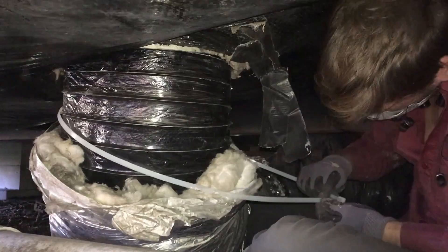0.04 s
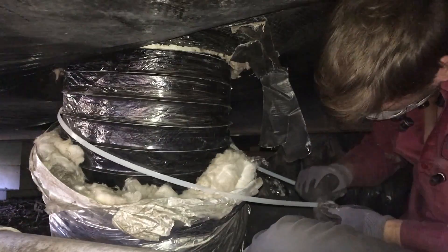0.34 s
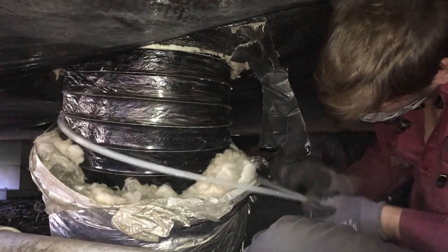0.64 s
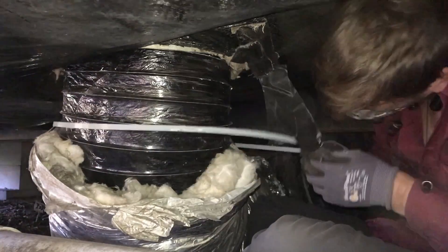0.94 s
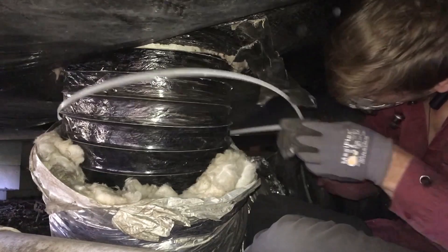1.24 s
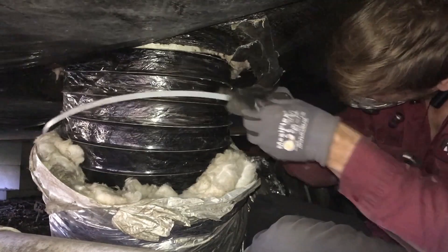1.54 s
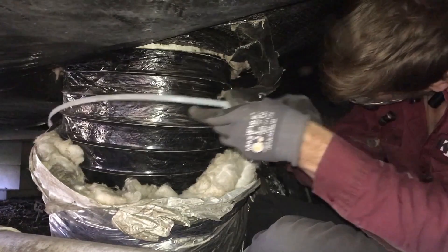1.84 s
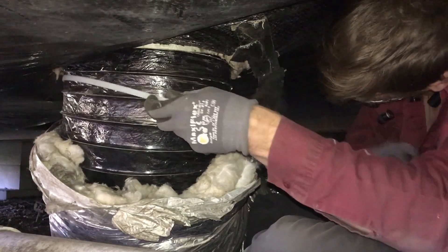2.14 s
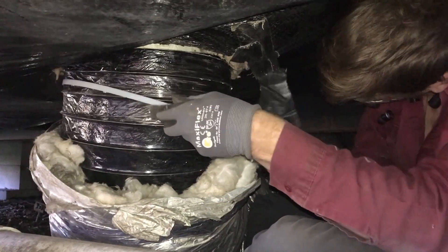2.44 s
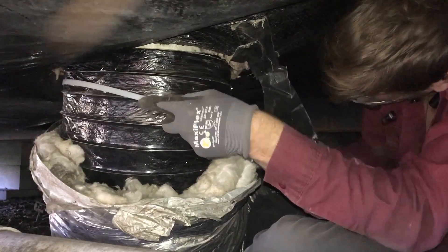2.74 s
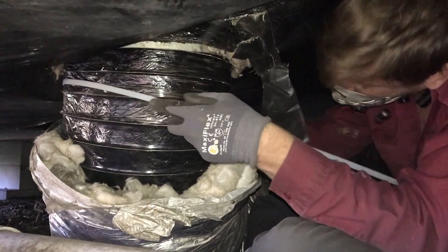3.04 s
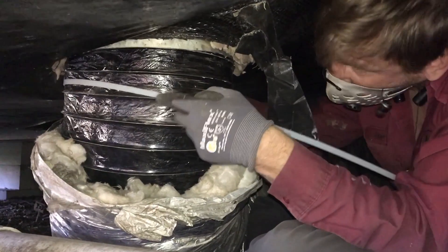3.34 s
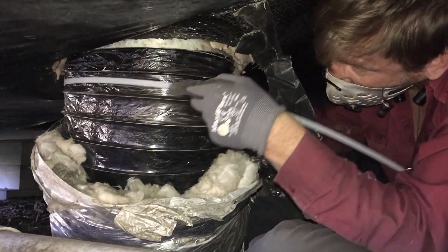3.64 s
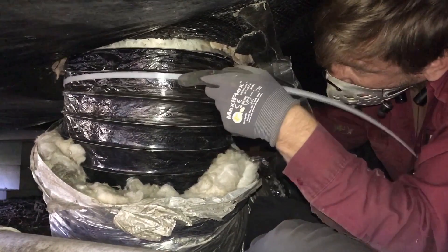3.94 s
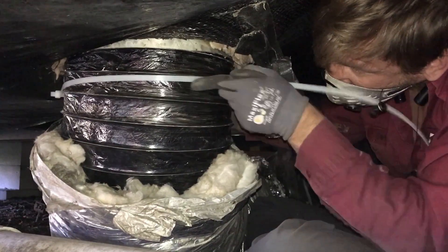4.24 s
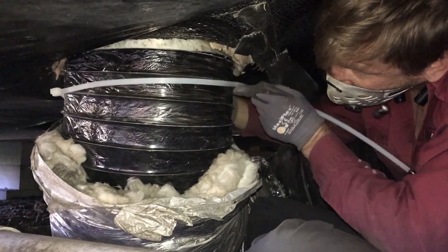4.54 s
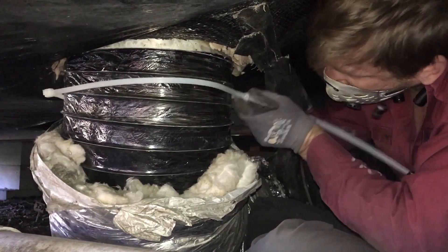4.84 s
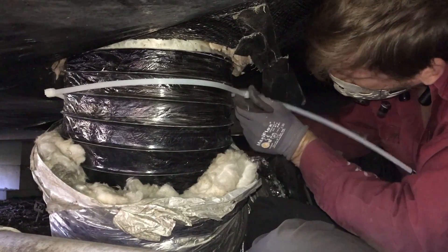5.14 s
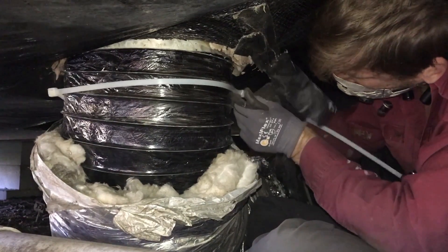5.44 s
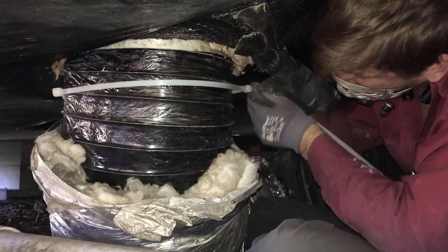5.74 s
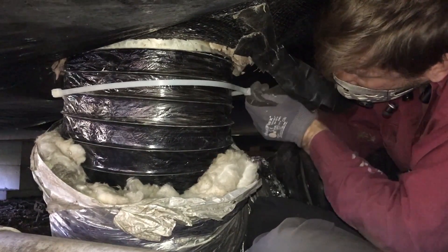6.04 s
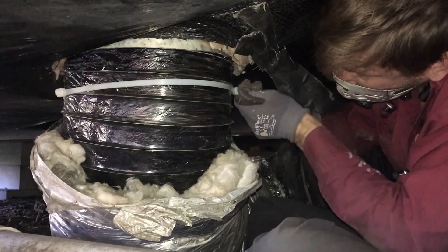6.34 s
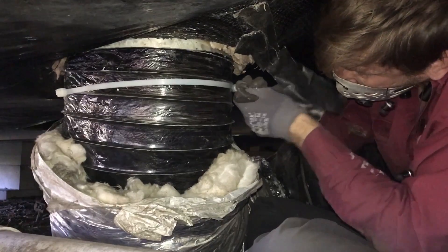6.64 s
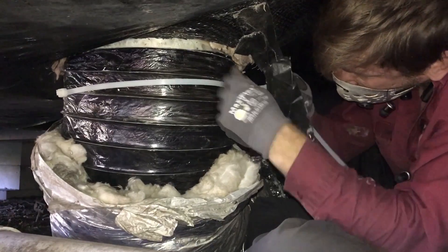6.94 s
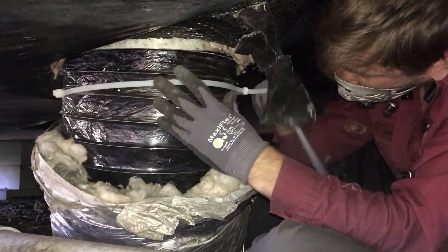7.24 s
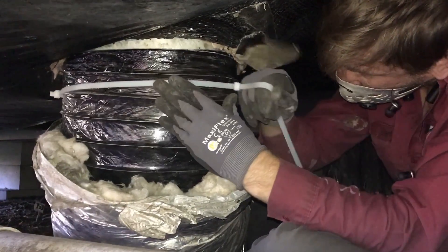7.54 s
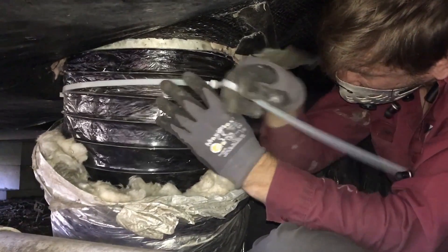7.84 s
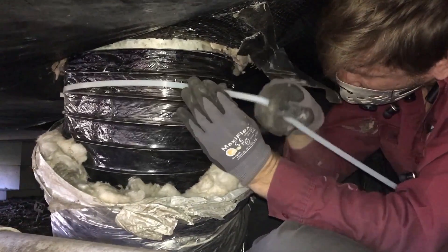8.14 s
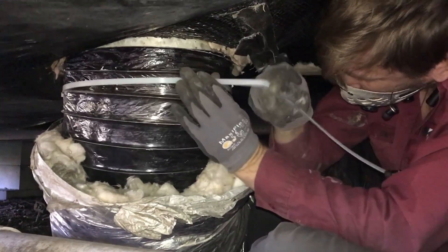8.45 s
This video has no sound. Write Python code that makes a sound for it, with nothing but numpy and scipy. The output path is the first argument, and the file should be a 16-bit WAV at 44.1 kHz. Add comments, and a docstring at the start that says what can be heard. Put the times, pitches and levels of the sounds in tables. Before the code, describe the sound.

Gloved hands pull a plastic cable tie through with a short, loud zip, then rub and crinkle a flexible duct and tighten a few clicks more.

```python
"""Sleeves rustle and light knocks sound over a low rumble in a cramped crawl space, where gloved hands
tighten a long nylon cable tie round a flexible foil duct. The strap slides, then zips through its pawl:
each tooth is an impulse, the pawl's resonance squeals, and the tooth rate is a tone that groans down
to a stop. A short pull and a few single teeth later draw it tight. Between the pulls, gloves rasp by
friction and the duct's thin skin buckles, crinkling and crunching."""
import sys
import numpy as np
from scipy import signal
from scipy.io import wavfile
from scipy.ndimage import uniform_filter1d

SR = 44100
rng = np.random.default_rng(int(sys.argv[2]) if len(sys.argv) > 2 else 0)


def generate_wav(signal):
    """Clip the signal to [-1, 1] and save it as 16-bit WAV at the path in sys.argv[1]."""
    frames = np.transpose(np.atleast_2d(signal))
    scaled = np.clip(frames, -1, 1) * 32767
    pcm = np.round(scaled).astype(np.int16)
    wavfile.write(sys.argv[1], SR, pcm)


N = 374409
TIME = np.arange(N) / SR
SLACK_FROM_S, SNUG_FROM_S, TIGHT_FROM_S = 1.75, 4, 6.25  # stages of the loop, which starts open

# Speed of the strap in the long pull and the tone it sings: time_s, teeth_per_s, groan_db
PULL_MOTION = [(1.7966, 430, -73), (1.869, 356, -50.5), (1.885, 520, -55), (1.922, 343, -62),
               (1.934, 600, -46.5), (1.95, 577, -45.5), (1.962, 710, -48.5), (1.977, 910, -38),
               (2.019, 858, -43.5), (2.08, 920, -57), (2.115, 747, -58), (2.155, 790, -42),
               (2.18, 830, -63), (2.2, 890, -54), (2.223, 767, -42.5), (2.24, 640, -56), (2.26, 640, -50.5),
               (2.28, 490, -51), (2.3, 342, -51), (2.332, 170, -63)]
# Spectrum of a snap in the foil skin: frequency_hz, gain_db
FOIL_SPECTRUM = [(300, -0.5), (900, 14), (4500, 13), (16000, 3.5)]


def amp(db):
    return 10 ** (np.asarray(db) / 20)


def unit_rms(x):
    return x / np.sqrt(np.mean(x ** 2) + 1e-20)


def running_rms(x, size):
    return np.sqrt(abs(uniform_filter1d(x ** 2, size)) + 1e-10)


def add(mix, start_s, sound):
    part = mix[max(round(start_s * SR), 0):][:len(sound)]
    part += sound[:len(part)]


def colour(x, spectrum, size=2048):
    """A minimum-phase filter of unit energy imposes a spectral shape."""
    hz, db = np.transpose(spectrum)
    bins = abs(np.fft.fftfreq(size, 1 / SR))
    log_gain = np.log(amp(np.interp(np.log(bins + 1), np.log(hz + 1), db)) + 1e-5)
    taps = np.fft.ifft(np.exp(np.conj(signal.hilbert(log_gain)))).real[:size // 2]
    return signal.oaconvolve(x, taps / np.linalg.norm(taps))[:len(x)]


def resonate(x, hz, width_hz):
    """A resonance of unit gain follows the frequency curve hz."""
    carrier = np.exp(2j * np.pi * np.cumsum(hz) / SR)
    pole = np.exp(-np.pi * width_hz / SR)
    return 2 * (carrier * signal.lfilter([1 - pole], [1, -pole], x / carrier + 1e-18)).real


def wander(per_s):
    """Random modulation glides between Gaussian values."""
    knots = rng.standard_normal(N // 16)
    return np.interp(TIME * per_s, np.arange(len(knots)), knots)


def snap(loose, t60, scatter=None, size=700):
    """An impulse and its decaying scatter, weighted by loose, share unit energy."""
    scatter = rng.standard_normal(size) if scatter is None else scatter
    scatter = scatter * amp(-60 * np.arange(size) / SR / t60)
    burst = loose * scatter / np.linalg.norm(scatter)
    burst[0] = 1
    return burst / np.linalg.norm(burst)


def impulse_size(db, window_s=0.015):
    """An impulse of this height has mean level db over the window."""
    return amp(db) * np.sqrt(window_s * SR)


def friction(grains_per_s, spread_db, grainy, flutter_db):
    """Stick-slip friction: countless tiny slips merge into noise, with sparse larger ones."""
    sizes = amp(spread_db * np.minimum(rng.exponential(1, N), 4)) * rng.choice([-1, 1], N)
    grains = unit_rms(sizes * (rng.random(N) < grains_per_s / SR))
    slips = rng.standard_normal(N) + grainy * grains
    return unit_rms(slips * amp(flutter_db * wander(per_s=55)))


def air(rumble_db=-66.5, hum_hz=59.8, hum_db=-81):
    """Low-frequency noise rumbles under a faint hum that wavers by phase modulation."""
    # Still air under the floor: frequency_hz, gain_db
    air_spectrum = [(20, -16.5), (45, -3), (81, -1), (130, -13.5), (320, -10), (450, -21.5), (1400, -27.5),
                    (1900, -23.5), (2400, -32), (9000, -35), (16000, -52)]
    hum = np.sqrt(2) * np.sin(2 * np.pi * hum_hz * TIME + wander(per_s=10))
    rumble = unit_rms(colour(rng.standard_normal(N), air_spectrum, size=16384))
    return amp(rumble_db) * rumble + amp(hum_db) * hum


def sleeves():
    """Friction in cloth keeps up a soft, fine-grained rustle, still only for a moment."""
    # Envelope of the rustle: time_s, level_db
    envelope = [(0, -64.5), (.3, -78.5), (.36, -113), (.45, -70.5), (2.4, -71.5), (5.6, -71), (8.49, -63.5)]
    # Spectrum of rubbing cloth: frequency_hz, gain_db
    cloth_spectrum = [(400, -11.5), (900, 3.5), (1300, -4.5), (2500, -0.5), (16000, -6)]
    rustle = friction(grains_per_s=300, spread_db=2.5, grainy=0.6, flutter_db=3.5)
    return colour(rustle * amp(np.interp(TIME, *np.transpose(envelope))), cloth_spectrum)


def knocks(rise_s=0.002):
    """Each impact gives a tick and excites quickly damped modes of strap and duct."""
    # Light impacts of strap and hands: start_s, body_db, tick_db, pitch_hz
    impacts = [(.027, -58.5, -71, 945), (0.192, -55.5, -63, 760), (0.2482, -54, -66, 960),
               (0.3701, -47, -57, 898), (.417, -58.5, -65.5, 840), (.477, -61, -83, 775),
               (.511, -56.5, -63.5, 826), (0.7517, -47, -52.5, 834), (1.211, -58, -55.5, 930),
               (2.2275, -43.5, -45, 858.4), (3.366, -61, -74, 990), (3.498, -57, -69, 990),
               (3.666, -60, -74, 950), (3.681, -54.5, -68, 1000), (3.79, -53.5, -51.5, 800),
               (4.565, -57, -50, 890), (4.706, -64.5, -61.5, 900), (5.486, -64, -55, 1080),
               (6.749, -52.5, -52.5, 800), (6.803, -61, -56, 570), (7.088, -58.5, -60.5, 340),
               (7.213, -56.5, -56.5, 710)]
    # Modes of strap and duct: frequency_ratio, gain_db, t60_s
    modes = [(0.998, 5.5, 0.013), (0.77, -17, 0.056), (1.21, -20.5, 0.035), (0.387, -18, 0.047),
             (1.77, -8, 0.011)]
    t = TIME[:SR // 10]
    bodies, ticks = np.zeros((2, N))
    for start_s, body_db, tick_db, hz in impacts:
        ring = sum(amp(db - 60 * t / t60) * np.sin(2 * np.pi * hz * k * t) for k, db, t60 in modes)
        ring *= 1 - np.exp(-t / rise_s)
        add(bodies, start_s, impulse_size(body_db) * ring / np.linalg.norm(ring))
        add(ticks, start_s, impulse_size(tick_db) * snap(loose=4.3, t60=0.024))
    return bodies + colour(ticks, FOIL_SPECTRUM)


def sliding(ends_db=-13, fold_hz=4900, fold_db=-2, gloves_from_s=2):
    """Sliding friction of the strap, later of gloves, hisses while the hollow duct resonates."""
    # Strokes over the duct: start_s, fastest_s, end_s, hiss_db, rub_db
    strokes = [(0.558, 0.774, 0.88, -67, -68), (0.912, 0.916, 0.97, -57, -60.5),
               (0.93, 1.195, 1.54, -62, -66.5), (2.199, 2.297, 2.44, -60.5, -65.5),
               (2.91, 3.41, 3.56, -66.5, -69.5), (3.787, 4.1, 4.24, -63, -74.5),
               (4.215, 4.575, 4.67, -56, -73), (4.73, 4.906, 5.2, -66, -81),
               (5.231, 5.26, 5.38, -61.5, -81), (6.82, 6.944, 7.1, -68.5, -69),
               (7.232, 7.38, 7.75, -57.5, -58.5), (7.503, 7.86, 7.96, -59, -62.5)]
    # Hiss of the loose strap: frequency_hz, gain_db
    strap_spectrum = [(900, -20), (1700, -23), (3300, -3), (11700, -0.5), (16000, -14)]
    # Rasp of the gloves: frequency_hz, gain_db
    glove_spectrum = [(900, -76), (1800, -6.5), (2400, -10.5), (3300, -1), (5500, -8), (13000, -6),
                      (16000, -17.5)]
    # Hollow response of the rubbed duct: frequency_hz, gain_db
    duct_spectrum = [(150, -12.5), (330, -0.5), (470, -7.5), (910, 1), (1240, -9.5), (1750, -5),
                     (3600, -17)]
    hiss_power, rub_power = np.zeros((2, N))
    for start, fastest, end, hiss_db, rub_db in strokes:
        before = (fastest - TIME) / max(fastest - start, 0.01)
        after = (TIME - fastest) / max(end - fastest, 0.01)
        speed_db = ends_db * np.minimum(np.maximum(before, after), 10) ** 2.23
        hiss_power += amp(hiss_db + speed_db) ** 2
        rub_power += amp(rub_db + speed_db) ** 2
    slips = friction(grains_per_s=800, spread_db=3.5, grainy=0.8, flutter_db=2) * np.sqrt(hiss_power)
    drags = friction(grains_per_s=220, spread_db=2, grainy=0.5, flutter_db=3) * np.sqrt(rub_power)
    # each fold touched lends the scrape a passing resonance
    passing_hz = fold_hz * 2 ** (0.5 * np.clip(wander(per_s=20), -2, 2))
    slips = (slips + amp(fold_db) * resonate(slips, passing_hz, width_hz=1500)) / np.sqrt(2)
    gloved = TIME > gloves_from_s
    hiss = colour(slips * ~gloved, strap_spectrum) + colour(slips * gloved, glove_spectrum)
    return hiss + colour(drags, duct_spectrum)


def tautness(time_s, taut_at_s=2.05, over_s=0.016):
    """Tension rises from 0 in the slack loop to 1 once it lies on the duct."""
    return np.clip((time_s - taut_at_s) / over_s, 0, 1)


def body_coupling(time_s, open_db=-25, snug_db=-8.5, tight_db=0.5):
    """Mechanical coupling: the tighter the strap, the more body vibration per click."""
    return amp(np.select([time_s < SNUG_FROM_S, time_s < TIGHT_FROM_S], [open_db, snug_db], tight_db))


def pawl_snaps(strikes, drift=0.21, stretch_per_s=0.58, stretch_from_s=1.6497, size=700):
    """Each tooth is an impulse: it clicks, pushes the strap's body and reflects along the free tail."""
    clicks, pushes = np.zeros((2, N))
    lag, echoes = np.arange(size), rng.standard_normal(size)
    for (time_s, click, push), (whip, grit, shake) in zip(strikes, rng.standard_normal((500, 3, size))):
        if time_s < SNUG_FROM_S:
            # the tail grows, so its echoes stretch and sink in pitch; it whips about, so they drift
            stretch = 1 + stretch_per_s * (time_s - stretch_from_s)
            echoes = unit_rms(echoes + drift * whip)
            scatter = np.interp(lag / stretch, lag, echoes) + 0.36 * grit
            # the first teeth snap cleanly; in the long pull the pawl chatters over each one
            loose, t60 = (1.0, 0.015) if time_s < SLACK_FROM_S else (2.7, 0.0098)
            add(clicks, time_s, click * snap(loose, t60, scatter))
            add(pushes, time_s, push * snap(loose=0.65, t60=0.031, scatter=0.5 * scatter + shake))
        else:
            # a tight strap snaps more sharply and shakes the duct
            add(clicks, time_s, click * snap(loose=2.5, t60=0.0088, scatter=0.5 * echoes + grit))
            add(pushes, time_s, push * snap(loose=0.65, t60=0.035, scatter=shake))
    return np.array([clicks, pushes])


def cable_tie():
    """Source and filter: tooth impulses excite pawl and strap, whose spectra change as the loop closes."""
    # Single teeth slipping past the pawl: start_s, level_db
    teeth = [(0.751, -46.5), (1.6353, -36.5), (1.6812, -40), (1.6894, -40), (1.6994, -38), (6.3016, -54),
             (6.3137, -50.5), (6.3340, -54.5), (6.4843, -49.5), (8.3713, -46.5), (8.393, -45),
             (8.3986, -46), (8.4307, -47), (8.4374, -49), (8.4570, -49.5), (8.478, -48)]
    # Short pulls: start_s, fastest_s, end_s, first_teeth_per_s, top_teeth_per_s, level_db, swell_db
    tugs = [(1.6497, 1.663, 1.679, 440, 600, -27.5, -2.5), (6.1515, 6.191, 6.2205, 170, 460, -38, 8.5)]
    # A tooth's click at five stages of closing the loop: frequency_hz, gain_db
    open_click = [(900, -52), (1900, -10.5), (3370, -8), (3910, -13), (5700, -0.5), (6900, -5),
                  (13000, 6.5), (16000, -2.5)]
    slack_click = [(900, -20.5), (1700, -3), (3400, -7), (4700, -8), (7700, 1), (11800, 4), (16000, -4)]
    taut_click = [(1500, -19), (3370, -8), (5120, -18), (6820, 0.5), (8850, -1), (10700, -10), (12000, 0.5),
                  (13600, -4), (15400, -1)]
    snug_click = [(1100, -40), (1900, -0.5), (4690, 1), (5780, -3.5), (7250, 5), (10000, 1), (11200, -3),
                  (13000, 1.5), (16000, -4)]
    tight_click = [(1100, -13), (2100, 1.5), (3500, -5), (4650, -4), (5830, -9.5), (10000, -8.5),
                   (11500, -23.5), (16000, -27)]
    # The strap's body, hanging free and pressed on the duct: frequency_hz, gain_db
    free_body = [(100, -42), (200, -2.5), (420, -7.5), (600, 0.5), (860, 6.5), (1250, -5), (1780, 2),
                 (2700, -34), (3600, -16)]
    pressed_body = [(130, -15), (330, 3.5), (680, 1.5), (850, 11.5), (1150, -3), (1650, 2), (3300, -19)]
    singles = [(s, impulse_size(db), impulse_size(db) * body_coupling(np.array(s))) for s, db in teeth]
    runs = [singles, long_pull()] + [tug(*row) for row in tugs]
    clicks, pushes = sum(pawl_snaps(run) for run in runs)
    taut = tautness(TIME)
    wide_open, pressed, tight = TIME < SLACK_FROM_S, TIME > SNUG_FROM_S, TIME > TIGHT_FROM_S
    running = clicks * ~wide_open * ~pressed
    early = colour(clicks * wide_open, open_click)
    zipping = colour(running * (1 - taut), slack_click) + colour(running * taut, taut_click)
    late = colour(clicks * pressed * ~tight, snug_click) + colour(clicks * tight, tight_click)
    body = colour(pushes * ~pressed, free_body) + colour(pushes * pressed, pressed_body)
    return early + zipping + late + body + pawl_ring(running) + groan()


def creases(fold_hz=920, fold_db=-55.5, db_per_octave=5):
    """Folds of the skin buckle with a dry snap; smaller, quieter folds have a higher low cutoff."""
    # The loudest buckling folds: start_s, level_db
    buckles = [(1.079, -62.5), (1.149, -61), (1.489, -63), (2.342, -56.5), (2.521, -68), (3.189, -65),
               (3.476, -59.5), (3.505, -61), (3.764, -51.5), (4.279, -59.5), (4.437, -63.5), (4.903, -53),
               (6.613, -56.5), (6.721, -54.5), (6.738, -56), (6.787, -64), (7.002, -62.5), (7.289, -52.5),
               (7.389, -55.5), (7.418, -55)]
    snaps = np.zeros(N)
    for start_s, db in buckles:
        cutoff_hz = min(fold_hz * 2 ** ((fold_db - db) / db_per_octave), SR / 10)
        fold = signal.lfilter(*signal.butter(2, cutoff_hz, "high", fs=SR), snap(loose=4, t60=0.017))
        add(snaps, start_s, impulse_size(db) * fold / np.linalg.norm(fold))
    return colour(snaps, FOIL_SPECTRUM)


def crunches():
    """Fingers press the skin into its padding and a cluster of small folds buckles at once."""
    # Finger presses: peak_s, time_constant_s, level_db, cutoff_hz
    presses = [(1.122, 0.01, -55, 4000), (3.714, 0.032, -60, 3500), (3.782, 0.019, -48, 15000),
               (4.579, .02, -48.5, 11300), (5.42, 0.014, -61.5, 9100), (6.72, 0.022, -59, 5970),
               (8.273, 0.015, -54.5, 13000)]
    grit = friction(grains_per_s=700, spread_db=2.5, grainy=1.2, flutter_db=2)
    clusters = np.zeros(N)
    for peak_s, time_constant_s, db, cutoff_hz in presses:
        muffled = unit_rms(signal.lfilter(*signal.butter(2, cutoff_hz, fs=SR), grit))
        clusters += muffled * amp(db) * np.exp(-abs(TIME - peak_s) / time_constant_s)
    return colour(clusters, FOIL_SPECTRUM)


def tooth_times(motion, jitter_s=0.000017):
    """Travel is the integral of speed; it gives the time and rate at which each tooth passes."""
    time_s, rate = np.transpose(motion)[:2]
    t = np.arange(time_s[0], time_s[-1], 1 / SR)
    travel = np.cumsum(np.interp(t, time_s, rate)) / SR
    at = np.interp(np.arange(int(travel[-1]) + 1), travel, t)
    return at + jitter_s * rng.standard_normal(SR)[:len(at)], np.interp(at, time_s, rate)


def tooth_force(rate, uneven_db=1.0):
    """Uneven impulses, scaled so that their train has about unit power at any rate."""
    return amp(uneven_db * rng.standard_normal(SR)[:len(rate)]) * np.sqrt(SR / rate)


def tug(start, fastest, end, first_rate, top_rate, level_db, swell_db, db_per_octave=6):
    """An impulse train speeds up and stalls; its level follows speed and tension."""
    at, rate = tooth_times([(start, first_rate), (fastest, top_rate), (end, 0.38 * top_rate)])
    speed_db = db_per_octave * np.log2(rate / top_rate)
    tension_db = swell_db * (at - fastest) / (end - start)
    click = tooth_force(rate) * amp(level_db + speed_db + tension_db)
    return list(zip(at, click, click * body_coupling(at)))


def long_pull(pull_db=-38, taut_db=-0.5, jerk_db=3.5, jerk_s=0.012, ease_db_per_octave=17):
    """An impulse train starts with a jerk, softens as the loop closes and fades as the strap slows."""
    # Vibration of the strap's body: time_s, level_db
    body_envelope = [(1.80, -43.5), (1.822, -70), (1.845, -44), (1.89, -43.5), (1.91, -63), (1.975, -51.5),
                     (2.11, -53.5), (2.28, -52.5), (2.33, -55)]
    ease_below_per_s, rattle_below_per_s, rattle_s = 366, 1100, 0.00007
    at, rate = tooth_times(PULL_MOTION)
    taut = tautness(at)
    click_db = pull_db + taut_db * taut + jerk_db * np.exp((at[0] - at) / jerk_s)
    click_db += ease_db_per_octave * taut * np.minimum(np.log2(rate / ease_below_per_s), 0)
    click_db += 1.5 * np.interp(at, TIME, wander(per_s=65))  # the grip wavers
    body_db = np.interp(at, *np.transpose(body_envelope))
    # a slack, slow strap rattles, so its teeth come unevenly
    slowness = np.maximum(1 - rate / rattle_below_per_s, 0)
    rattle = rattle_s * slowness * (1 - taut) * rng.standard_normal(SR)[:len(at)]
    click = tooth_force(rate) * amp(click_db)
    push = tooth_force(rate, uneven_db=3) * amp(body_db)
    return list(zip(at + rattle, click, push))


def pawl_ring(clicks, slack_width_hz=2900, taut_width_hz=600, steadiness=0.65):
    """The flexed pawl resonates at each tooth; taut and fast, its ring narrows to a steady squeal."""
    # Resonance of the flexing pawl: time_s, pitch_hz, level_db
    resonance = [(1.796, 12200, -34), (1.825, 11600, -54), (2.067, 9300, -75), (2.09, 9100, -34),
                 (2.155, 8800, -40.5), (2.215, 9660, -37), (2.24, 9550, -46), (2.276, 8740, -40),
                 (2.335, 9050, -73)]
    time_s, hz, db = np.transpose(resonance)
    pull_s, rate, _ = np.transpose(PULL_MOTION)
    pitch, taut = np.interp(TIME, time_s, hz), tautness(TIME)
    broad = resonate(resonate(clicks, pitch, slack_width_hz), pitch, slack_width_hz)
    ring = broad * (1 - taut) + resonate(broad, pitch, taut_width_hz) * taut
    # dividing by a faster envelope fills the gaps between teeth
    steady = steadiness * taut * np.interp(TIME, pull_s, rate) / rate.max()
    envelope = running_rms(ring, size=441) ** (1 - steady) * running_rms(ring, size=22) ** steady
    ringing = (TIME > time_s[0]) & (TIME < time_s[-1])
    return ring / envelope * amp(np.interp(TIME, time_s, db)) * ringing


def groan(overtones_db=(-17, -16), waver_db=3.5):
    """Forced vibration: the strap sings at the tooth rate, so its pitch falls as it stalls."""
    time_s, rate, db = np.transpose(PULL_MOTION)
    pulling = (TIME > time_s[0]) & (TIME < time_s[-1])
    pitch_hz = np.interp(TIME, time_s, rate) * pulling
    phase = 2 * np.pi * np.cumsum(pitch_hz) / SR + 0.2 * wander(per_s=220)
    tone = np.sin(phase)
    for harmonic, overtone_db in enumerate(overtones_db, 2):
        tone += amp(overtone_db + waver_db * wander(per_s=150)) * np.sin(harmonic * phase)
    level = amp(np.interp(TIME, time_s, db) + waver_db * wander(per_s=90))
    return np.sqrt(2) * tone * level * uniform_filter1d(1.0 * pulling, size=128)


def crinkling(start_s=2.3, per_s=16, smallest_db=-78, spread_db=5):
    """Once the strap lies on the duct, tiny folds of its skin tick as a Poisson process."""
    sizes = amp(spread_db * np.minimum(rng.exponential(1, N), 2)) * (rng.random(N) < per_s / SR)
    ticks = signal.oaconvolve(sizes * (TIME > start_s), snap(loose=6.5, t60=0.006))[:N]
    return impulse_size(smallest_db) * colour(ticks, FOIL_SPECTRUM)


def thuds(rise_s=0.0085, t60=0.7):
    """Tugged or gripped, the soft duct sways with a dull thud and settles by damping."""
    # Pushes on the duct: start_s, level_db
    pushes = [(6.2, -55), (7.22, -55)]
    # Response of the swaying duct: frequency_hz, gain_db
    sway_spectrum = [(25, -6), (55, 5), (90, -8), (400, -27)]
    t, envelope = TIME[:SR // 2], np.zeros(N)
    for start_s, db in pushes:
        add(envelope, start_s, amp(db - 60 * t / t60) * (1 - np.exp(-t / rise_s)))
    return colour(envelope * rng.standard_normal(N), sway_spectrum, size=8192)


def edge_scrape(start_s=7.25, end_s=7.47, pitch_hz=4650, width_hz=800, level_db=-61):
    """Friction of the strap's edge on foil drives a thin, gritty resonance as the hand regrips."""
    stroke = np.sin(np.pi * np.clip((TIME - start_s) / (end_s - start_s), 0, 1))
    grit = friction(grains_per_s=78, spread_db=2, grainy=1.5, flutter_db=4)
    hz = np.full(N, float(pitch_hz))
    ring = resonate(resonate(grit, hz, width_hz), hz, width_hz)
    return amp(level_db) * stroke * unit_rms(ring)


def crawl_space(x, t60, wet_db):
    """Absorption by close, padded walls leaves only a brief, dull reverberation."""
    t = TIME[:8192]
    echoes = rng.standard_normal(len(t)) * (t > 0.003) * amp(-60 * t / t60)
    echoes = colour(echoes, [(1000, -2.0), (4000, -5.5), (15000, -8.5)])
    return x + amp(wet_db) * signal.oaconvolve(x, echoes / np.linalg.norm(echoes))[:N]


def scene():
    """Superposition of the reverberant handling sounds, the thuds and the air, in mono."""
    handling = cable_tie() + knocks() + creases() + crunches() + crinkling()
    handling = handling + sliding() + sleeves() + edge_scrape()
    return (crawl_space(handling, t60=0.072, wet_db=-14) + thuds() + air())[None]


def record(dry):
    """A linear-phase low-pass filter removes the highest treble."""
    cutoff_hz = 16100
    taps = signal.firwin(401, cutoff_hz, window=("kaiser", 8), fs=SR)
    return signal.oaconvolve(dry, taps[None], "same")


dry = scene()
out = record(dry)
generate_wav(out)
```